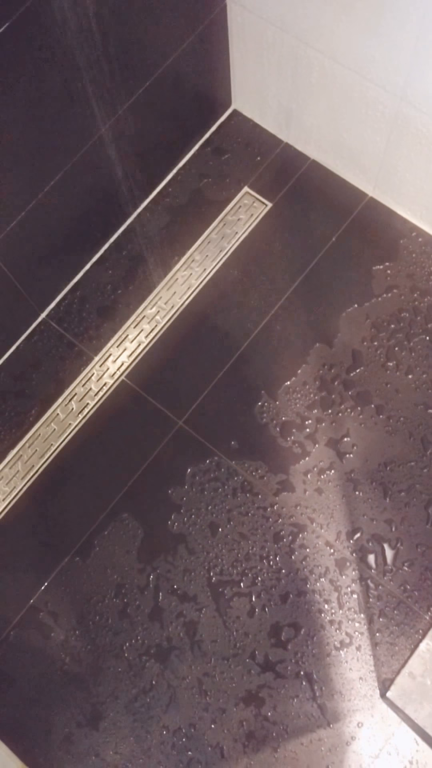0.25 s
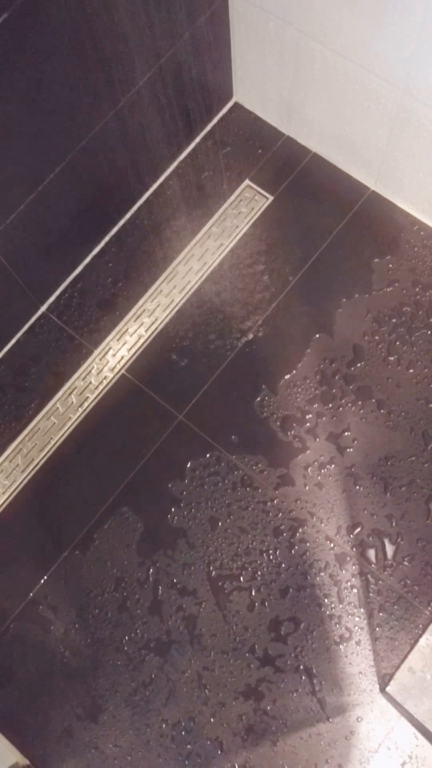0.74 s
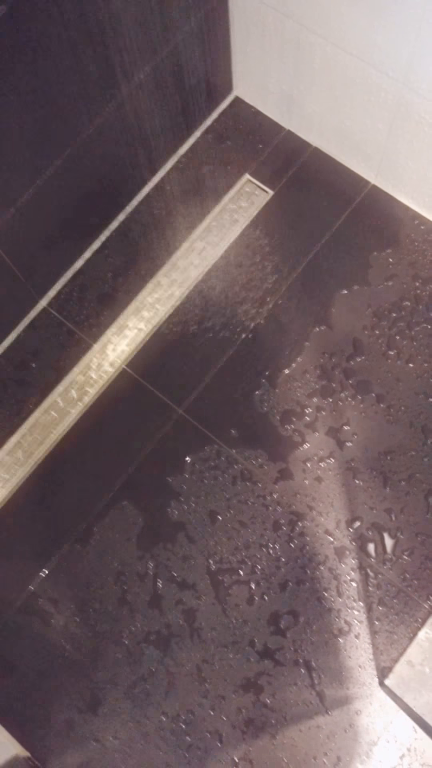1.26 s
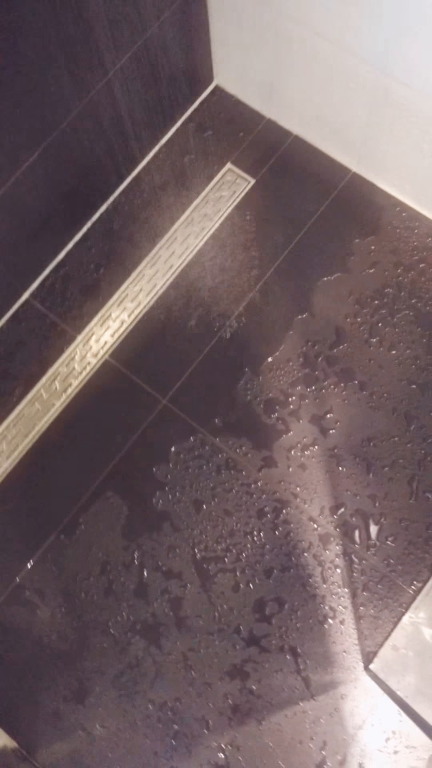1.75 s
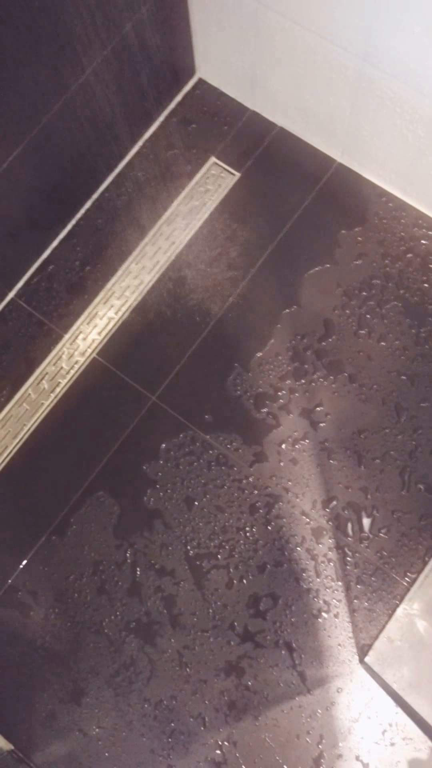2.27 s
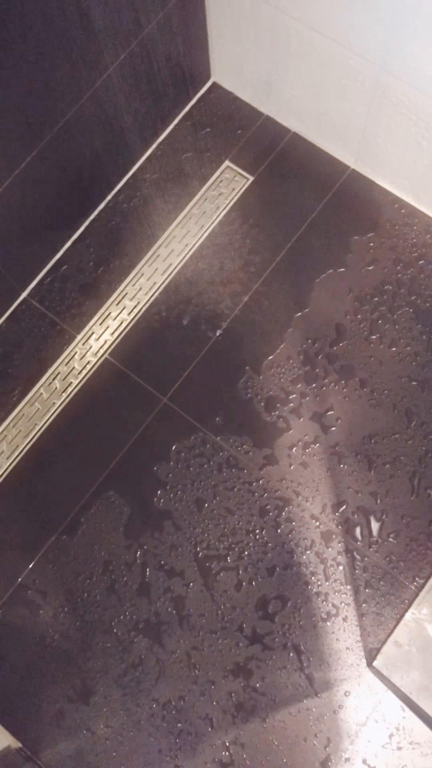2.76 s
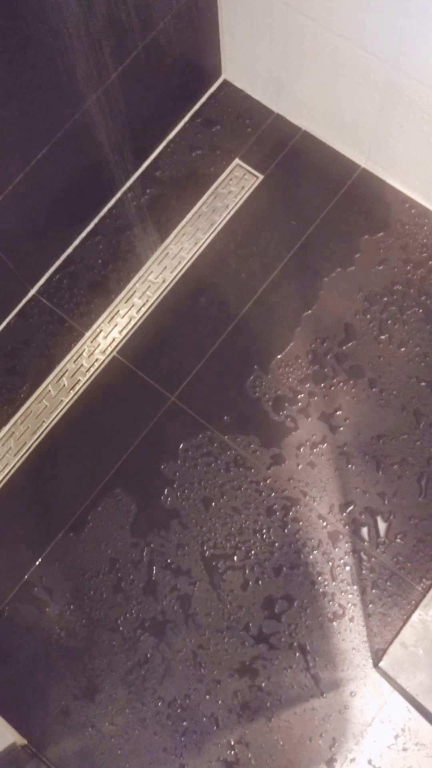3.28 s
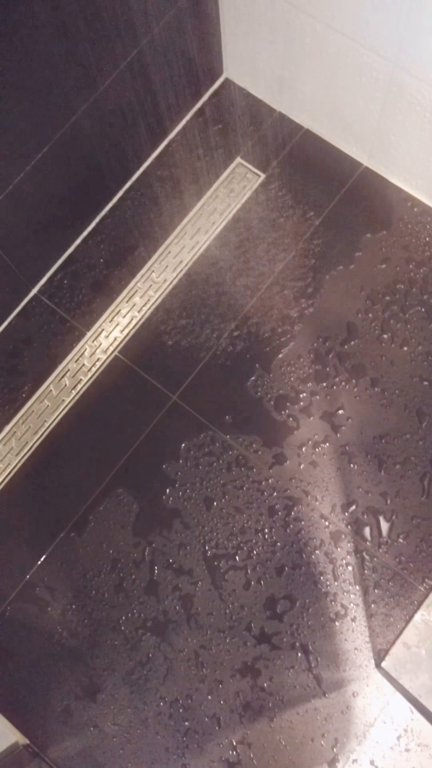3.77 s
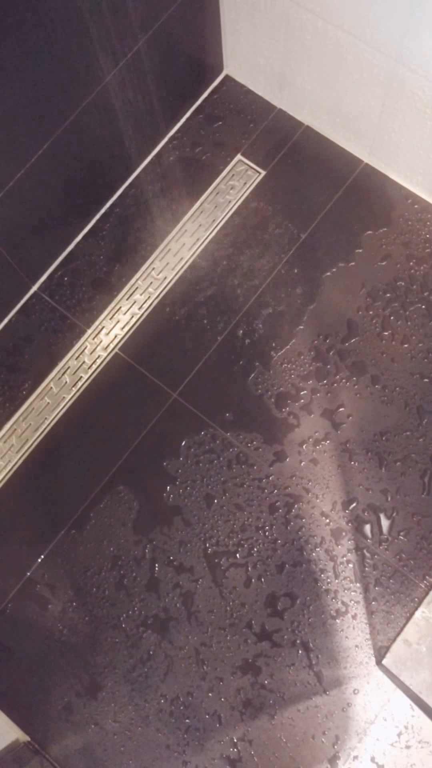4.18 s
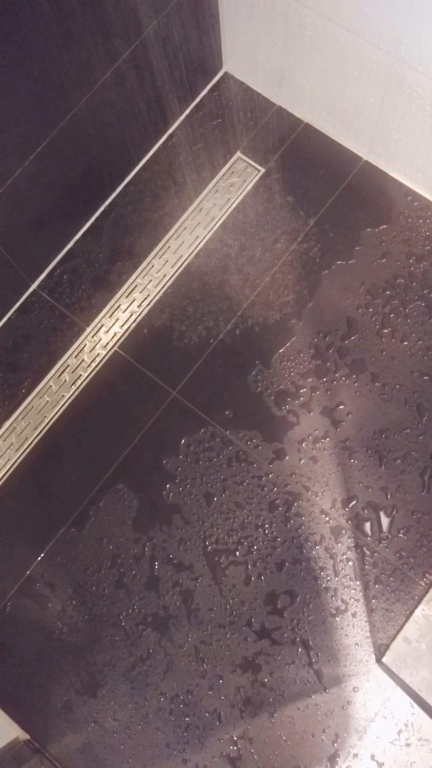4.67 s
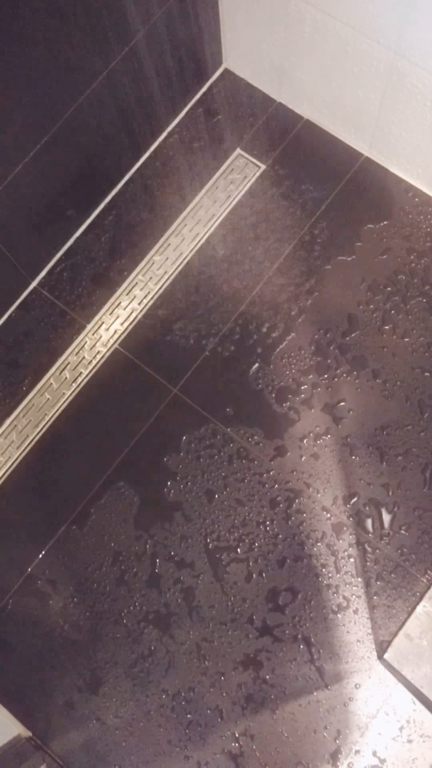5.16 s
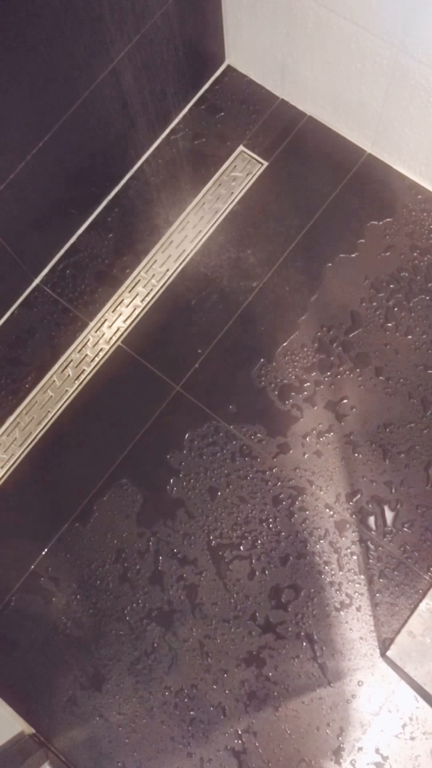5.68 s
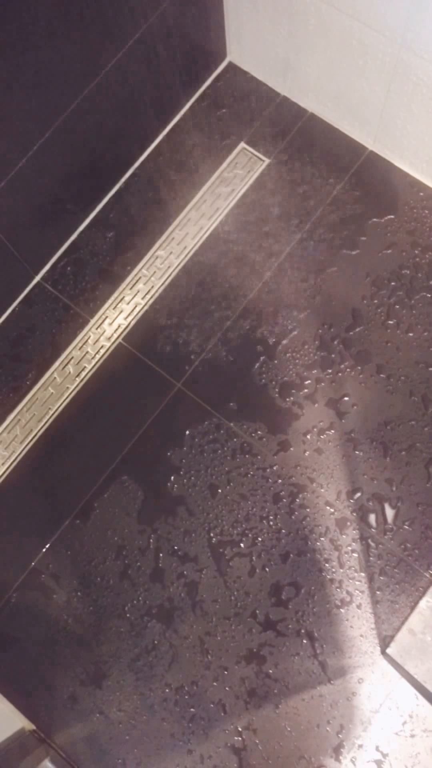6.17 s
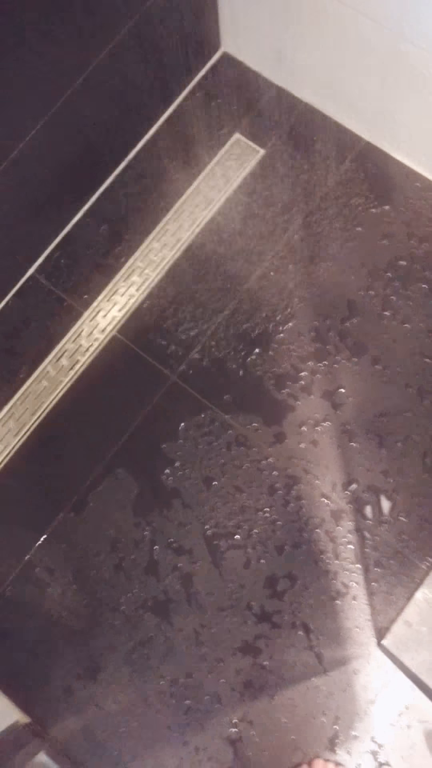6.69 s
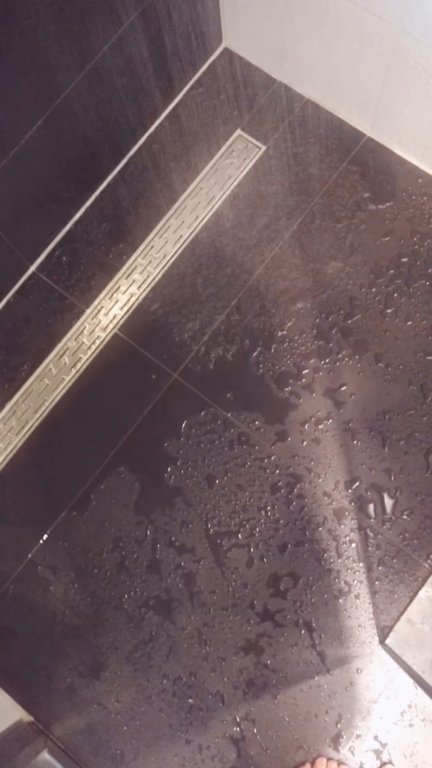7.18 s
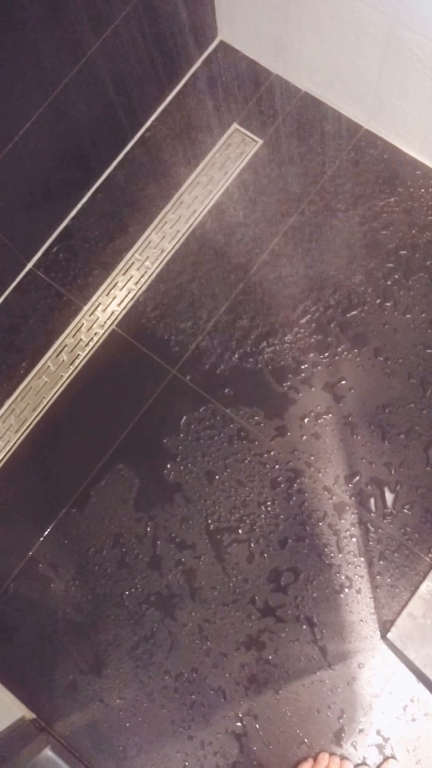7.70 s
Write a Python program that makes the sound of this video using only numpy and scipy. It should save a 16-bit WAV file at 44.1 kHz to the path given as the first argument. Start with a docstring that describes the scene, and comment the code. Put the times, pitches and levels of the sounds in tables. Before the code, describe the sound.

Bright, uneven shower hiss patters on a wet tiled floor, briefly faltering and surging, with crisp splashes and faint bubbling in a close, hard room.

```python
"""A shower spray sputters onto the wet tiles and steel drain of a small hard bathroom.
From the start, bursts of noise merge into a swelling hiss; small bubbles and resonances ring along.
Splats, noise bursts with a crack in front, come at once; short falters and shifts of the flow follow.
The strongest splat lands near 4.75 s and a low knock near 6.3 s; the spray runs on to the end.
Two microphone ports hear it all; the recorder subtracts each, delayed, from the other to widen the stereo."""
import sys
import numpy as np
from scipy import signal
from scipy.fft import rfft, irfft
from scipy.io import wavfile

SR = 44100
rng = np.random.default_rng(int(sys.argv[2]) if len(sys.argv) > 2 else 0)


def wav_out(sig):
    """Save sig, one row per channel (or a flat mono array), as 16-bit PCM at SR to the path in sys.argv[1]."""
    wavfile.write(sys.argv[1], SR, np.round(np.clip(np.atleast_2d(sig).T, -1, 1) * 32767).astype(np.int16))


N = 350154
HZ = np.maximum(np.fft.rfftfreq(N, 1 / SR), 1)   # the bottom is kept off zero for the logarithm

# slow swell of the flow, each level used relative to its column's mean:
# (start_s, floor_drumming_db, puddle_patter_db, fine_spray_db)
FLOW_SWELL = [(0.0, -55, -40.5, -40), (0.13, -61, -40, -37.5), (0.2, -53.5, -41, -40),
              (1.5, -51, -40.5, -40), (1.75, -47.5, -37, -35.5), (2.39, -53, -38, -40),
              (2.94, -53, -43.5, -42), (3.14, -52, -39.5, -39.5), (3.4, -56.5, -42.5, -38.5),
              (3.91, -49.5, -37.5, -39), (4.15, -49, -39.5, -39), (4.38, -48, -34.5, -36.5),
              (4.6, -51, -40, -36), (4.8, -50, -38, -36.5), (5.17, -54, -44.5, -38.5),
              (5.31, -49.5, -40, -41), (5.55, -49.5, -35.5, -40), (5.86, -52, -42.5, -36.5),
              (6.17, -51.5, -40.5, -43.5), (6.39, -49, -38.5, -38.5), (6.59, -50, -42, -37.5),
              (7.14, -50, -38.5, -37), (7.58, -49.5, -41.5, -37), (7.94, -53, -41.5, -38)]
# air in the pipe starves the spray, then it returns quickly:
# (deepest_s, sag_s, patter_loss_db, fine_spray_loss_db)
AIR_FALTERS = [(0.1, 0.083, 3, 6), (0.3, 0.086, 2.5, 4), (0.4, 0.1, 2, 4), (0.97, 0.11, 2, 5),
               (1.46, 0.087, 1, 2.5), (1.86, 0.13, 0, 2.5), (2.13, 0.085, 4, 5.5), (2.67, 0.08, 3, 2),
               (2.89, 0.1, 1, 8.5), (3.3, 0.067, 0.5, 1.5), (3.85, 0.079, 4, 4), (4.115, 0.098, 1, 1.5),
               (5.24, 0.083, 0, 9.5), (5.84, 0.064, 3.5, 5), (6.17, 0.081, 2.5, 2), (6.61, 0.027, 4.5, 3),
               (6.7, 0.12, 4, 6.5), (6.95, 0.11, -0.5, 3), (7.82, 0.049, 0, 0.5)]
# short swells of the flow, each shifting patter and fine spray up or down:
# (peak_s, patter_shift_db, fine_spray_shift_db)
FLOW_SHIFTS = [(0.19, 4, -2), (0.52, 1.5, 1), (0.66, 2.5, -2.5), (0.73, 3, 2), (0.82, 1, 0.5), (1.09, 1, 0),
               (1.26, 2, 0.5), (1.39, 2, 0.5), (1.75, 0, 0), (2.03, -1, 3), (2.19, -1, 0.5),
               (2.29, -2, 2.5), (2.45, 0, 0.5), (2.6, 1.5, 2.5), (2.95, 5, 2), (3.01, 1.5, 2.5),
               (3.22, 4.5, 1.5), (3.56, 1.5, 2.5), (3.62, 2, 0.5), (4.02, 0.5, 2), (4.2, 1, 2), (4.4, 0, 1),
               (4.55, 5.5, 0.5), (5.08, 3.5, 0), (5.44, 1.5, 3.5), (5.67, 2, 3), (5.9, 3.5, 1.5),
               (6.02, 1, 0), (6.39, 3.5, 3.5), (6.77, 4.5, 5.5), (7.03, 3, 1), (7.1, 2, 2.5), (7.33, -2, 2),
               (7.72, 0.5, 2)]
# slugs of water landing, levels relative within the splats:
# (start_s, level_db, pitch_hz, crack_over_burst_db)
WATER_SLUGS = [(0.0283, -24.5, 9000, 18), (0.04, -14, 6300, 8), (0.1411, -16, 6800, -4),
               (0.167, -28, 3800, 9), (0.145, -30, 7500, 16), (0.178, -15.5, 7570, 10),
               (0.4903, -20.5, 8800, 14), (0.51, -20, 6940, 12), (0.6604, -15.5, 6700, -7),
               (0.718, -16, 5300, 1), (0.887, -13, 6650, -10), (1.0784, -16, 3170, -9),
               (1.256, -18, 8500, 8), (1.6016, -15.5, 9400, 9), (1.73, -23, 3400, 10),
               (1.9076, -24, 3540, 3), (2.0066, -14.5, 8500, -5), (2.186, -18.5, 3460, 7),
               (2.2765, -13, 9000, 3), (2.4464, -16.5, 8800, -4), (2.9158, -25, 3460, 10),
               (2.939, -19, 8500, 8), (3.0006, -16.5, 3370, 13), (3.057, -24, 9150, 10),
               (3.0704, -14.5, 7800, -3), (3.1632, -18, 8550, 2), (3.232, -16, 9100, 10),
               (3.285, -24, 7460, 2), (3.365, -21, 6140, 2), (3.394, -19, 7900, 2),
               (3.5433, -11.5, 8460, -10), (3.593, -11.5, 1240, -5), (3.737, -17, 3600, -2),
               (3.905, -28, 6800, 3), (4.0155, -26, 9000, 21), (4.0405, -30, 9000, 10),
               (4.126, -14, 9600, 9), (4.1725, -9.5, 4660, 2), (4.187, -16, 3780, 13),
               (4.329, -11.5, 11000, 7), (4.3839, -13, 3350, 8), (4.4806, -16, 8340, 2),
               (4.5316, -19, 8740, 15), (4.576, -10.5, 5000, 0), (4.6723, -23, 11200, 9),
               (4.751, -5.5, 6500, 3), (4.816, -14, 6900, -5), (4.871, -22, 11500, 7),
               (5.0958, -16.5, 9200, -6), (5.4246, -11.5, 10200, -13), (5.635, -29, 2390, 4),
               (5.672, -10.5, 9600, 2), (5.7877, -20, 6250, 5), (5.863, -16.5, 8900, -2),
               (6.0215, -18.5, 9200, 15.5), (6.2797, -14, 10000, 9), (6.304, -11, 500, -22),
               (6.342, -15, 9150, -2), (6.366, -17, 3600, 4), (6.3826, -14, 10600, 6),
               (6.636, -14.5, 9800, 4), (6.6802, -18, 8900, -4), (6.7221, -12, 8740, 7),
               (6.758, -12, 8900, 4), (6.82, -17, 7550, -2), (6.991, -14, 6360, -9), (7.069, -16, 7140, 5),
               (7.0832, -12.5, 8550, 7), (7.329, -23, 8000, 17), (7.3855, -13, 11000, -13),
               (7.422, -17, 2630, -5), (7.457, -22, 2960, -5), (7.6435, -13, 8660, -6),
               (7.693, -17, 6900, 6), (7.782, -18, 9060, 3)]
# resonances of the stall and drain; the 3140 Hz row is just a broad band of noise:
# (pitch_hz, width_hz, level_db, left_port_lead_share)
RESONANCES = [(153.8, 5.6, -57.5, 0.0059), (188, 28, -63, -0.081), (218.3, 9.6, -63.5, 0.31),
              (237.3, 10, -63, -0.2), (289.3, 7.1, -59, 0.12), (310.5, 8.4, -69, -0.11),
              (346.8, 8, -61, 0.02), (383, 6.3, -69.5, -0.033), (420, 28, -65, 0.34), (483, 31, -67, 0),
              (518, 13, -67, -0.74), (569, 14, -69.5, 0.18), (623.7, 16, -66.5, 0.085),
              (674, 35, -63, 0.89), (734.5, 33, -63.5, -0.17), (803.6, 29, -62, 0.007),
              (864, 15.5, -64, -.2), (887, 26, -67, -0.24), (1304, 57, -66, 0.5), (1584, 43, -67.5, 0.23),
              (1818, 15, -61.5, 0.24), (3140, 460, -55, -0.74)]
# sound at the ports: (pitch_hz, level_db_per_hz, difference_over_common_db, right_over_left_db)
PORT_COLOUR = [(28, -10, -9, 0), (55, -25, -11, -7), (99, -13.5, -12, -1.5), (144, -5.5, -11, -3),
               (302, -17, -3.5, -14.5), (550, -10, -14, -3), (754, -15.5, 1, 13), (1088, -12.5, 2.5, -10),
               (1390, -10.5, 2.5, -9.5), (2140, -12, 2.5, -18), (2680, -18.5, 9, -15),
               (2850, -7, 1.5, 15.5), (4110, -7, 2, -5), (5000, 0, -8, 6), (5340, -2.5, -4, 2),
               (6000, -4.5, 5.5, 1.5), (6940, -1.5, -0.5, 2.5), (8000, -0.5, 0.5, 1.5),
               (10580, -1.5, -2, 0.5), (12050, -5, 1.5, -1), (15500, -7, -0.5, -4.5)]
# the recorder's crossed path: (pitch_hz, subtracted_share)
CROSS_SHARE = [(100, 0.82), (4000, 1), (5000, 0.83), (6300, 0.33), (7600, 0.43), (9000, 0.26),
               (10000, 0.76), (11200, 0.29), (12400, 0.2), (15000, 0.54)]
# delay of that path: (pitch_hz, delay_ms)
CROSS_DELAY = [(2480, .403), (3700, .406), (4950, .404), (6300, .397), (7650, .392), (8900, .393),
               (10000, .4), (12400, .403)]
# narrow bands where the sum of the channels is hollow: (pitch_hz, width_hz, depth_db)
SUM_HOLLOWS = [(2468, 371, 33), (4902, 358, 31)]
# the same for their difference: (pitch_hz, width_hz, depth_db)
DIFFERENCE_HOLLOWS = [(3700, 270, 18), (6310, 400, 4.5), (8900, 300, 9), (11200, 450, 4)]

# how fast falters and shifts pass, and the share of their patter change that the drumming takes
RETURN_S, DRUM_FALTER_SHARE = 0.058, 0.46
SHIFT_IN_S, SHIFT_OUT_S, DRUM_SHIFT_SHARE = 0.05, 0.072, 0.4
# drops and sparser spatters; levels are against the smooth wash
DROPS_PER_S, DROP_T60_S, DROPS_DB = 4000, 0.026, 6
SPATTERS_PER_S, SPATTER_T60_S, SPATTERS_DB = 60, 0.054, -2.5
DROP_SPREAD_DB = 1.5
# which part of the flow drives which pitches
DRUM_TOP_HZ, PATTER_TOP_HZ = 1000, 4800
# above this the patter takes a share of the fine spray's swings
PATTER_THINS_HZ, THIN_SHARE = 2200, 0.41
# the lowest bands and resonances take only a share of the drumming's swings
STEADY_TOP_HZ, STEADY_SHARE = 400, 0.87
# the faint rumble comes in lumps
RUMBLE_TOP_HZ, RUMBLE_LUMPS_DB = 90, 4
BUBBLES_PER_S, BUBBLE_CYCLES, BUBBLES_DB = 380, 21, -53.5
# how a slug dies away, how wide its pitch is, how ragged its drops
SPLAT_T60_S, CRACK_T60_S, SPLAT_OCTAVES, RAGGED_DB = 0.27, 0.02, 0.5, 4
# duller slugs are short knocks: the lower, the shorter
DULL_BELOW_HZ = 1800
LOW_WAVER_DB, HIGH_WAVER_DB, WAVER_HZ = 1.5, 3.5, 2.1
# dense upper modes of the hard room: depth, spacing, and where they start to blur together
RIPPLE_DB, RIPPLE_HZ, RIPPLE_FADES_HZ = 1.5, 14, 3500
CUTOFF_HZ = 15480


def from_db(db):
    """Decibels to gain."""
    return 10 ** (np.asarray(db) / 20)


def rms_one(x):
    """Scale to an average strength (rms) of 1."""
    return x / np.sqrt(np.mean(x ** 2) + 1e-20)


def columns_at(points, hz):
    """Read a table's columns at any pitch, along a log-frequency axis."""
    at, *columns = np.transpose(points)
    return [np.interp(np.log(hz), np.log(at), column) for column in columns]


def drift(rate_hz):
    """Slow random wander of spread 1: noise at every 40th sample, smoothed twice."""
    r = np.exp(-80 * np.pi * rate_hz / SR)
    noise = rng.standard_normal(N // 40 + 2002)
    slow = signal.lfilter([1], [1, -2 * r, r * r], noise)[2000:]   # skip the filter's start
    return np.interp(np.arange(N) / 40, np.arange(len(slow)), rms_one(slow))


def dying(clicks, t60):
    """Each click leaves a tail of its own height that fades exponentially."""
    return signal.lfilter([1], [1, -from_db(-60 / (t60 * SR))], clicks + 1e-18)


def band(x, low_hz, high_hz):
    """Keep only one range of pitches."""
    sos = signal.butter(2, [low_hz, min(high_hz, .45 * SR)], "band", fs=SR, output="sos")
    return signal.sosfilt(sos, x)


def ring(x, hz, width_hz):
    """Resonance at one pitch, gain 1 on top; the narrower, the longer it rings."""
    r = np.exp(-np.pi * width_hz / SR)
    top = (1 - r * r) / 2 * np.array([1, 0, -1])
    return signal.lfilter(top, [1, -2 * r * np.cos(2 * np.pi * hz / SR), r * r], x + 1e-18)


def bumps(rows, rise_s, fall_s):
    """Patter and fine-spray dB of events that ramp to their moment and back."""
    t, out = np.arange(N) / SR, np.zeros((2, N))
    for (s, *db), rise in zip(rows, np.broadcast_to(rise_s, len(rows))):
        corners_s = [s - max(rise, .005), s, s + max(fall_s, .005)]
        out += np.outer(db, np.interp(t, corners_s, [0, 1, 0]))
    return out


def flow():
    """Drumming, patter and fine spray in dB: the slow swell, plus short shifts, minus falters."""
    s, *levels = np.transpose(FLOW_SWELL)
    drum, patter, fine = [np.interp(np.arange(N) / SR, s, db - db.mean()) for db in levels]
    shift = bumps(FLOW_SHIFTS, SHIFT_IN_S, SHIFT_OUT_S)
    sag_s = np.array(AIR_FALTERS)[:, 1]
    falter = bumps(np.delete(AIR_FALTERS, 1, axis=1), sag_s, RETURN_S)
    drum = drum + DRUM_SHIFT_SHARE * shift[0] - DRUM_FALTER_SHARE * falter[0]
    return [drum, patter + shift[0] - falter[0], fine + shift[1] - falter[1]]


def showering(per_s, t60):
    """Power of bursts of uneven size that start at once and die away; mean 1."""
    sizes = from_db(DROP_SPREAD_DB * np.minimum(rng.exponential(1, N), 4.0))
    landed = rng.random(N) < per_s / SR
    power = dying(sizes ** 2 * landed, t60 / 2)   # halved because this is power
    return power / power.mean()


def drops():
    """Single drops and sparser spatters as bursts of noise, over the smooth wash of their echoes."""
    power = 1 + from_db(2 * DROPS_DB) * showering(DROPS_PER_S, DROP_T60_S)
    power = power + from_db(2 * SPATTERS_DB) * showering(SPATTERS_PER_S, SPATTER_T60_S)
    return rms_one(np.sqrt(power) * rng.standard_normal((2, N)))


def spray(flows, patchy_db, flicker_db):
    """Half-octave bands of drops; each follows the flow and wavers a little on its own."""
    drum, patter, fine = flows
    lumps_db = RUMBLE_LUMPS_DB * drift(2.3)
    thin = patter + THIN_SHARE * (fine - patter)
    falls, out = [drops(), drops()], 0   # neighbouring bands take different drops
    edges = 25 * 2 ** np.arange(0, 9.6, .5)
    for k, (low, high) in enumerate(zip(edges, edges[1:])):
        hz = np.sqrt(low * high)
        if hz < STEADY_TOP_HZ:
            flow_db = STEADY_SHARE * drum
        elif hz < DRUM_TOP_HZ:
            flow_db = drum
        elif hz < PATTER_THINS_HZ:
            flow_db = patter
        else:
            flow_db = thin if hz < PATTER_TOP_HZ else fine
        if hz < RUMBLE_TOP_HZ:
            flow_db = flow_db + lumps_db
        waver_db = patchy_db * drift(15.0) + flicker_db * drift(14.0)
        out = out + from_db(flow_db + waver_db) * band(falls[k % 2], low, high)
    return out


def bubbles(patter_db, low_hz, high_hz):
    """Air caught under drops in the puddle rings briefly at scattered pitches."""
    born = rng.random(N) < BUBBLES_PER_S / SR
    loudness = from_db(2.9 * np.minimum(rng.exponential(1, N), 3.0))
    sizes = born * loudness * rng.standard_normal((2, N))
    pitches, dealt = np.geomspace(low_hz, high_hz, 24), rng.integers(0, 24, N)
    rings = sum(ring(sizes * (dealt == k), hz, 2.3 * hz / BUBBLE_CYCLES) for k, hz in enumerate(pitches))
    return from_db(BUBBLES_DB + patter_db) * rms_one(rings)


def resonances(flows):
    """Noise rings at set pitches, fed by drumming low and patter high; one port hears it a little ahead."""
    drum, patter, _ = from_db(flows)
    steady = from_db(STEADY_SHARE * flows[0])
    noise, rings = rng.standard_normal((2, N)), []
    for k, (hz, width_hz, db, lead) in enumerate(RESONANCES):
        if hz < STEADY_TOP_HZ:
            drive, waver_db = steady, LOW_WAVER_DB
        else:
            drive, waver_db = drum if hz < DRUM_TOP_HZ else patter, HIGH_WAVER_DB
        level = from_db(db + waver_db * drift(WAVER_HZ))
        rings.append(level * rms_one(ring(noise[k % 2] * drive, hz, width_hz)))
    rings = np.array(rings)
    leads = np.array(RESONANCES)[:, 3]
    gradient = irfft(1j * rfft(leads @ rings), N)   # a quarter cycle ahead
    return rings.sum(axis=0) + gradient * [[1], [-1]]


def splats():
    """Each slug lands with a broad crack, then bursts into a ragged run of drops around its own pitch."""
    count, length = len(WATER_SLUGS), SR // 4
    out, noise = np.zeros((2, N + SR)), rng.standard_normal((count, 2, length))
    steps_db = RAGGED_DB * rng.standard_normal((count, SR // 400 + 1))
    ragged = from_db(steps_db).repeat(100, axis=1)[:, :length]
    ragged[:, :300] = from_db(2.0)   # the front of the slug lands all at once
    t = np.arange(length) / SR
    edge = 2 ** (SPLAT_OCTAVES / 2)
    for (s, db, hz, crack_db), hiss, clumps in zip(WATER_SLUGS, noise, ragged):
        low, high = hz / edge, hz * edge
        burst = rms_one(band(band(hiss * clumps, low, high), low, high))
        burst = burst * from_db(-60 * t / SPLAT_T60_S / min(1, hz / DULL_BELOW_HZ))
        crack = rms_one(band(hiss, 2600, 14500)) * from_db(crack_db - 60 * t / CRACK_T60_S)
        at = round(s * SR)
        out[:, at:at + length] += from_db(db) * (burst + crack)
    return out[:, :N]


def at_ports(x):
    """Colour of spray and room, and how alike the two ports hear it."""
    level_db, apart_db, lean_db = columns_at(PORT_COLOUR, HZ)
    peaks = rng.standard_normal((2, SR // 8))
    ripple = np.array([np.interp(HZ / RIPPLE_HZ, np.arange(SR // 8), p) for p in peaks])
    ripple_db = RIPPLE_DB * ripple / np.hypot(1, HZ / RIPPLE_FADES_HZ)
    common, apart = rfft(x) * from_db(level_db + ripple_db)
    apart = apart * from_db(apart_db)
    lean = from_db(lean_db / 2)
    return irfft([(common + apart) / lean, (common - apart) * lean], N)


def hollows(rows):
    """Gain with steep-sided, flat-bottomed dips."""
    return from_db(-sum(db / (1 + (2 * (HZ - hz) / width_hz) ** 8) for hz, width_hz, db in rows))


def scene():
    """Spray, bubbles and splats as the ports hear them, plus the resonances."""
    flows = flow()
    water = from_db(-32.0) * rms_one(spray(flows, patchy_db=0.63, flicker_db=2.03))
    water = water + bubbles(flows[1], low_hz=954, high_hz=11000)
    water = water + from_db(-21.0) * splats()
    return at_ports(water) + resonances(flows)


def record(dry):
    """Each channel loses the other port's delayed sound and the top is cut. Apart from that, the finished sound
    is hollow in a few narrow bands of the channels' sum and of their difference."""
    (share,), (ms,) = columns_at(CROSS_SHARE, HZ), columns_at(CROSS_DELAY, HZ)
    ports = rfft(dry)
    delayed = np.exp(-2j * np.pi * HZ * ms / 1000) * ports[::-1]   # channels swapped
    left, right = ports - np.clip(share, 0, 1) * delayed
    both = (left + right) / 2 * hollows(SUM_HOLLOWS)
    apart = (left - right) / 2 * hollows(DIFFERENCE_HOLLOWS)
    top_cut = signal.ellip(14, .3, 75, CUTOFF_HZ, fs=SR, output="sos")
    return signal.sosfilt(top_cut, irfft([both + apart, both - apart], N))


dry = scene()
out = record(dry)
wav_out(out)
```